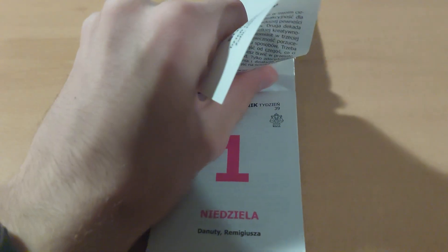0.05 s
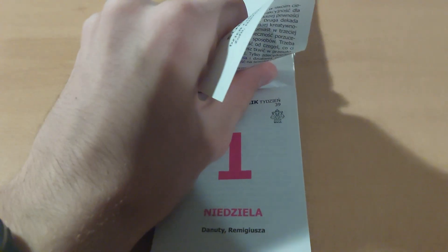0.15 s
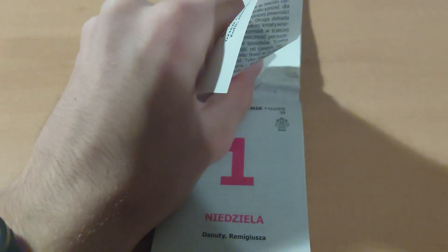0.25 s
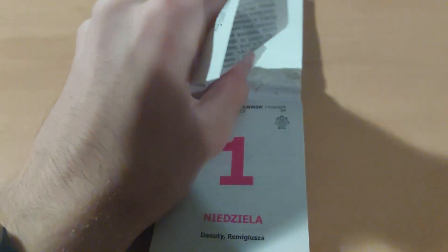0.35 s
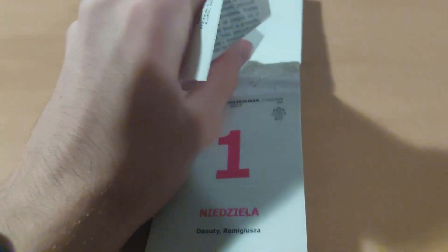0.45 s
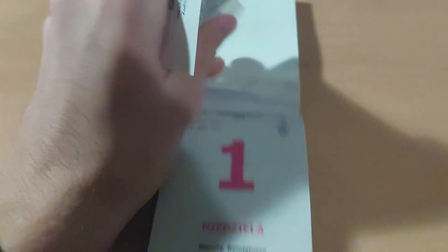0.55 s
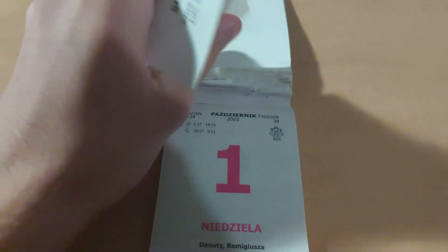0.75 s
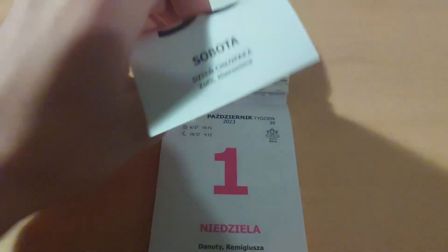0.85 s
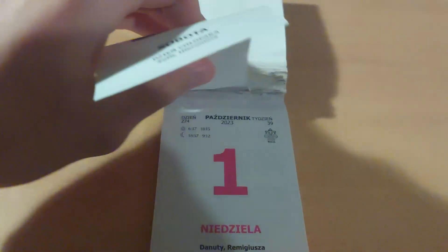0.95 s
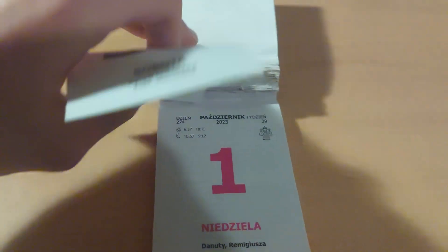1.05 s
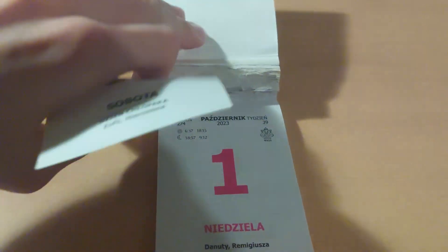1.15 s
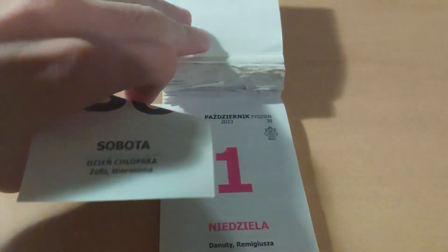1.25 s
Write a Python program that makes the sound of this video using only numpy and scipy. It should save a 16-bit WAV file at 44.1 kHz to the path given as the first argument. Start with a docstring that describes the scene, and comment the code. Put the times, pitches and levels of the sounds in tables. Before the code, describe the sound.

A paper leaf rips sharply from a calendar pad at about 0.2 seconds and crackles on, close by in a small room. Just before 0.6 seconds comes a last fast tear, ending in a pop and a light knock on the wooden table. From 0.7 to 1.3 seconds the loose leaf flaps and rustles softly, over faint rumble and hiss.

```python
"""A leaf is torn off a calendar pad on a wooden table, close to the microphone, in a small room.
At 0.23 s the glued edge gives with a sharp rip of snapping fibres, then crackles on.
From 0.56 s it lets go in a last fast tear; at 0.62 s the freed sheet pops taut and the pad rings the table.
Then the loose leaf flaps and rustles softly as the hand turns it over. Faint rumble and hiss throughout."""
import sys
import numpy as np
from scipy import signal
from scipy.fft import rfft, irfft
from scipy.io import wavfile

SR = 44100
rng = np.random.default_rng(int(sys.argv[2]) if len(sys.argv) > 2 else 0)


def store_pcm(level_fs):
    """Save levels as 16-bit WAV."""
    pcm = np.round(np.clip(level_fs, -1, 1) * 32767).astype(np.int16)
    wavfile.write(sys.argv[1], SR, np.atleast_2d(pcm).T)


N = 57330
T = np.arange(N) / SR


def amp(db):
    """Decibels to gain."""
    return 10 ** (np.asarray(db) / 20)


def lookup(points, hz):
    """Table value at hz, interpolated over log frequency."""
    f, value = np.transpose(points)
    return np.interp(np.log(hz + 1), np.log(f + 1), value)


def colour(x, points, tilt_db_per_oct=0, pivot_hz=4000):
    """Minimum-phase filter with the given spectrum, tilted about a pivot."""
    hz = abs(np.fft.fftfreq(4096, 1 / SR))
    octaves = np.log2(np.maximum(hz, pivot_hz / 6) / pivot_hz)
    log_gain = np.log(amp(lookup(points, hz) + tilt_db_per_oct * octaves))
    taps = np.fft.ifft(np.exp(np.conj(signal.hilbert(log_gain)))).real[:2048]
    return signal.fftconvolve(x, taps)[:N]


def resonate(x, hz, width_hz):
    """Unity-gain resonance at a steady or moving frequency."""
    carrier = np.exp(2j * np.pi * np.cumsum(hz * np.ones(N)) / SR)
    pole = np.exp(-np.pi * width_hz / SR)
    return 2 * (carrier * signal.lfilter([1 - pole], [1, -pole], x / carrier + 1e-18)).real


def crackle(per_s, spread_db):
    """Random clicks of uneven size, rms 1."""
    size = amp(spread_db * np.minimum(rng.exponential(1, N), 3))
    clicks = size * rng.choice([-1, 1], N) * (rng.random(N) < per_s / SR)
    return clicks / (clicks.std() + 1e-12)


def strike(start_s, rise_s, decay_s):
    """Envelope: linear rise, exponential fall."""
    age = np.maximum(T - start_s, 0)
    return np.minimum(age / rise_s, 1) * np.exp(-np.maximum(age - rise_s, 0) / decay_s)


# fibre bursts, plus the sheet's pop crack at 0.6196 s: t/s, level/dB, decay/s, tilt/(dB/oct), sheet ring/dB,
# sheet ring/Hz
SNAPS = [(.099, -68, 0.0016, 9, 7.5, 4300), (0.2265, -27, 0.0021, 2.5, -21, 4384),
         (0.2348, -22, .002, 0.5, -12, 4274), (.236, -14, 0.0026, 0, 5, 4120),
         (0.2412, -19, .003, -4, 7.5, 4800), (0.274, -26, 0.0011, -2, 2.5, 4460),
         (0.287, -17.5, 0.0023, 2, -22, 4300), (0.372, -38, 0.0029, -3, 6.5, 3200),
         (0.4208, -24, 0.0013, -1, 4, 3000), (.423, -42, 0.0023, -9.5, 13, 3000),
         (0.4328, -41, .002, -3.5, 2.5, 3100), (0.452, -32, 0.005, -3.5, -16.5, 3200),
         (0.4614, -36, 0.0041, -6.5, -12.5, 3190), (0.4736, -42, 0.0034, -9, -17, 3200),
         (0.4816, -37, 0.00098, 0, -7, 3200), (0.5253, -38.5, 0.00086, -1, 13, 3300),
         (0.5379, -33.5, 0.00091, -1.5, -2, 3300), (0.5613, -14.5, 0.00053, -1.8, -3, 3400),
         (0.5675, -42.5, 0.0044, 7.5, 4.5, 3350), (0.615, -21.5, 0.0012, -10, -9.5, 4000),
         (0.6196, -26, 0.00092, -3.5, 8.5, 1680), (0.9361, -50.5, 0.0044, -7, -2.5, 3400),
         (0.9696, -43.5, .001, -1, -6.5, 4000), (1.091, -54.5, 0.0012, 2.5, -18, 4000),
         (1.1258, -62.5, 0.0055, 4.5, 2, 5170), (1.1794, -61.5, .005, 1, -24.5, 4000),
         (1.257, -52.5, 0.005, 1.5, 3, 2400), (1.282, -68, .002, -3, -9, 4000)]
# snap spectrum: f/Hz, level/dB
SNAP_SPECTRUM = [(40, -15.5), (130, -18), (300, -25.5), (600, -10.5), (1000, 0), (2100, -4), (2650, -11.5),
                 (3300, -3), (4900, 1), (6300, -3.5), (8000, 3.5), (10500, 0.5), (15000, 0.5)]

def snaps():
    """Bundles of fibres break at once and ring the stretched sheet; the burst at 0.6196 s is the treble crack
    of the sheet popping taut."""
    fibres = crackle(per_s=24000, spread_db=1.5)
    out = np.zeros(N)
    for start_s, db, decay_s, tilt_db_per_oct, ring_db, ring_hz in SNAPS:
        burst = fibres * amp(db) * strike(start_s, 0.00019, decay_s)
        ring = amp(ring_db) * resonate(burst, ring_hz, width_hz=590)
        out += colour(burst + 2 * ring, SNAP_SPECTRUM, tilt_db_per_oct)
    return out


# tear along the binding: t/s, level/dB, sheet ring/Hz, sheet ring/dB
TEAR_PATH = [(.222, -58.5, 4300, 4), (.246, -37, 4400, 12.5), (.262, -46.5, 4130, 12),
             (.283, -33, 4240, 2.5), (.335, -55, 4210, -12.5), (0.364, -57, 3228, 17), (.387, -47, 3230, 6),
             (.412, -58.5, 3104, 4), (.445, -48.5, 3025, 6.5), (.475, -44, 3200, -9.5),
             (.505, -58, 3400, 0.5), (0.558, -42, 3350, 8.5), (.566, -32, 3334, 2.5), (.598, -29, 4070, 1),
             (.617, -34, 3920, -11.5), (.635, -46.5, 4200, -2.5), (.7, -73.5, 4200, -1.5)]
# tear spectrum: f/Hz, level/dB
TEAR_SPECTRUM = [(40, -4), (150, -3), (350, -13), (650, -1.5), (1200, 6), (2000, -6), (2700, -2.5),
                 (4500, -3.5), (8000, -1), (10500, -8.5), (14000, 3), (15500, -3.5)]

def tear():
    """Fibres and stouter bundles part one by one; the sheet's ring moves with the free length."""
    t_s, db, ring_hz, ring_db = np.transpose(TEAR_PATH)
    fibres = crackle(per_s=3400, spread_db=9)
    bundles = amp(-1.5) * crackle(per_s=130, spread_db=2.5)
    breaks = (fibres + bundles) * amp(np.interp(T, t_s, db, left=-120, right=-120))
    drive = breaks * amp(np.interp(T, t_s, ring_db))
    ring = resonate(drive, np.interp(T, t_s, ring_hz), width_hz=480)
    return colour(breaks + 2 * ring, TEAR_SPECTRUM)


POP_S = 0.6193

def pop(start_hz=1435, end_hz=716, sag_s=0.0006, rise_s=0.00074, low_cut_hz=380):
    """The sheet flips taut, its pitch falling as it flattens; so small a sheet radiates little bass."""
    age = np.maximum(T - POP_S, 0)
    hz = end_hz + (start_hz - end_hz) * np.exp(-age / sag_s)
    phase = 2 * np.pi * np.cumsum(hz * (age > 0)) / SR
    swell = (age / rise_s * np.exp(1 - age / rise_s)) ** 2
    swings = -amp(-2) * swell * np.sin(phase)
    return signal.sosfilt(signal.butter(2, low_cut_hz, "highpass", fs=SR, output="sos"), swings)


# pad and table modes: f/Hz, level/dB, t60/s
TABLE_MODES = [(133, -49.5, 0.36), (238, -40, 0.27), (309, -33, 0.14), (483, -33, 0.12), (779, -31.5, 0.22),
               (942.7, -23, 0.11), (1120, -31.5, 0.071), (1458, -36, 0.141)]

def table_ring():
    """The pad drops back as the sheet lets go and rings the table top."""
    age = np.maximum(T - POP_S, 0)
    return sum(amp(db - 60 * age / t60_s) * np.sin(2 * np.pi * hz * age)
               for hz, db, t60_s in TABLE_MODES)


# bumps on the pad: t/s, level/dB, decay/s, tilt/(dB/oct)
BUMPS = [(0.239, -23.5, 0.024, -1.5), (0.272, -9.5, 0.0064, 0), (0.287, -25, 0.016, -3.5),
         (.625, -16.5, 0.034, 1), (0.662, -30, 0.013, 4), (0.777, -34.5, 0.051, 0.5),
         (0.818, -30, 0.019, 4), (0.839, -36.5, 0.024, -3), (1.178, -44, 0.024, 5.5)]
# bump spectrum: f/Hz, level/dB
BUMP_SPECTRUM = [(25, -35.5), (45, -3.5), (65, 1.5), (95, -7), (130, 6.5), (180, -9), (300, -6),
                 (600, -5.5), (1200, -8), (1800, -25), (2500, -20.5), (8000, -62)]

def bumps():
    """Sheet and hand knock the pad: dull flaps and nudges."""
    contact = crackle(per_s=5500, spread_db=0.5)
    out = np.zeros(N)
    for start_s, db, decay_s, tilt_db_per_oct in BUMPS:
        push = contact * amp(db) * strike(start_s, 0.001, decay_s)
        out += colour(push, BUMP_SPECTRUM, tilt_db_per_oct, pivot_hz=324)
    return out


# friction swells: peak t/s, level/dB, rise/s, fall/s
RUSTLES = [(.668, -52, .015, 0.0227), (0.731, -54, 0.0075, 0.018), (0.775, -47.5, .018, .018),
           (0.81, -46.5, 0.0085, 0.013), (.9, -62, .02, .02), (.955, -55, 0.034, 0.025),
           (1.03, -73, 0.026, 0.15), (1.134, -56, .008, 0.024), (1.181, -51, 0.031, 0.027),
           (1.272, -57, 0.036, .04)]
# rustle spectrum: f/Hz, level/dB
RUSTLE_SPECTRUM = [(40, -15), (140, 7.5), (350, -13), (900, -4.5), (1500, -9), (2300, -10), (5000, 0),
                   (8000, 0.5), (11000, -4), (15000, -1.5)]

def rustle():
    """The loose leaf slides on the fingers: fine friction grains with small crinkles among them."""
    swells = sum(amp(db) * np.exp(-((T - peak_s) / np.where(T < peak_s, rise_s, fall_s)) ** 2)
                 for peak_s, db, rise_s, fall_s in RUSTLES)
    grains = crackle(per_s=4200, spread_db=3.5)
    crinkles = amp(-3.5) * crackle(per_s=250, spread_db=0.89)
    return colour((grains + crinkles) * swells, RUSTLE_SPECTRUM)


# room decay: f/Hz, t60/s
ROOM_T60 = [(80, 0.17), (300, 0.489), (1000, 0.22), (4000, 0.33), (8000, 0.27), (15000, 0.19)]

def echoes(near_db, room_db, near_decay_s=0.0019, build_s=0.016, coherent_hz=850, size=26000):
    """Impulse response at two microphone ports: quick echoes off hand and table, then the room's tail."""
    near = rng.choice([-1., 1.], (2, size)) * (rng.random((2, size)) < 0.15)
    near *= strike(0.0004, 0.00022, near_decay_s)[:size]
    hz, t_s, noise = signal.stft(rng.standard_normal((2, size)), SR, nperseg=256)
    coherence = 1 / (1 + (hz[:, None] / coherent_hz) ** 4)
    noise[1] = coherence * noise[0] + np.sqrt(1 - coherence ** 2) * noise[1]
    decay = amp(-60 * t_s / lookup(ROOM_T60, hz)[:, None])
    tail = signal.istft(noise * decay, SR, nperseg=256)[1][:, :size]
    tail *= np.minimum(T[:size] / build_s, 1)
    return sum(amp(db) * part / np.linalg.norm(part, axis=1, keepdims=True)
               for db, part in ((near_db, near), (room_db, tail)))


def room(x, left_lag_s, near_db, room_db, paths=1, cycle_s=0.09):
    """Direct sound at both ports plus echoes; a moving sheet cycles through several echo paths."""
    hz = np.fft.rfftfreq(2 * N, 1 / SR)
    delays = np.exp(1j * np.pi * hz * left_lag_s * np.array([[-1], [1]]))
    direct = irfft(rfft(x, 2 * N) * delays)[:, :N]
    turns = T / cycle_s - np.arange(paths)[:, None] / paths
    feeds = np.maximum(np.cos(2 * np.pi * turns), 1e-6)
    feeds /= np.linalg.norm(feeds, axis=0)
    return direct + sum(signal.fftconvolve((x * feed)[None], echoes(near_db, room_db), axes=1)[:, :N]
                        for feed in feeds)


# noise floor: f/Hz, level/dB
FLOOR_SPECTRUM = [(20, -43.5), (50, -32), (90, -43), (140, -47.5), (200, -53.5), (500, -65), (1000, -68),
                  (2500, -82), (4500, -69), (8000, -72), (15000, -75)]

def background():
    """Faint room rumble and hiss, partly common to both ports."""
    common, left, right = rng.standard_normal((3, N))
    return np.array([colour(0.59 * common + 0.86 * own, FLOOR_SPECTRUM) for own in (left, right)])


def scene():
    """Paper, pad and table in the room."""
    paper_lag_s, pad_lag_s = -0.00028, 0.00027
    return (room(snaps(), paper_lag_s, near_db=-5, room_db=-7, paths=4)
            + room(tear() + rustle(), paper_lag_s, near_db=-3, room_db=-5, paths=4)
            + room(pop(), pad_lag_s, near_db=-19.5, room_db=-21.5)
            + room(bumps() + table_ring(), pad_lag_s, near_db=-17.5, room_db=-14.5)
            + background())


# microphone port responses: f/Hz, level/dB
LEFT_RESPONSE = [(60, -4), (300, -0.5), (1200, -5), (2200, 3.5), (3000, 1.5), (4400, -4), (5200, 0.5),
                 (8100, 0.5), (9000, -7), (10500, -3), (12400, 0), (14000, -2.5), (15600, -3.5)]
RIGHT_RESPONSE = [(60, -12.5), (300, -1), (1200, -1), (2000, 9), (2600, 6), (3300, 3.5), (4400, 8),
                  (5600, 1), (6400, -12.5), (7300, -29.5), (8400, -16), (9500, -24.5), (12000, -1.5),
                  (14000, -14.5), (15600, -21)]
LOW_CUT_HZ, HIGH_CUT_HZ = 39.76, 15800

def record(dry):
    """Microphone: each port's response, rumble filter, band limit."""
    ports = np.array([colour(dry[0], LEFT_RESPONSE), colour(dry[1], RIGHT_RESPONSE)])
    highpass = signal.butter(4, LOW_CUT_HZ, "highpass", fs=SR, output="sos")
    lowpass = signal.firwin(401, HIGH_CUT_HZ, window=("kaiser", 8), fs=SR)
    return signal.oaconvolve(signal.sosfilt(highpass, ports), lowpass[None], "same")


dry = scene()
out = record(dry)
store_pcm(out)
```